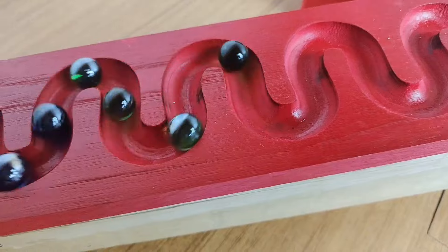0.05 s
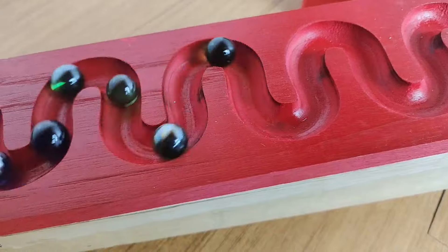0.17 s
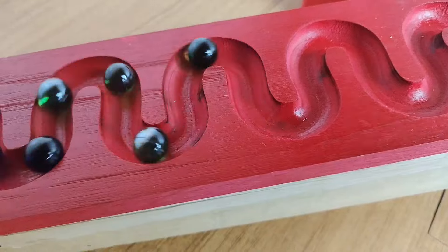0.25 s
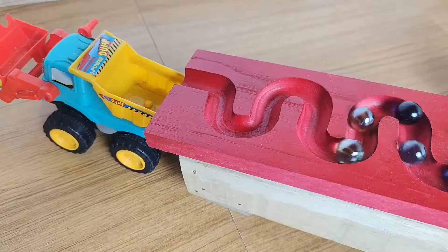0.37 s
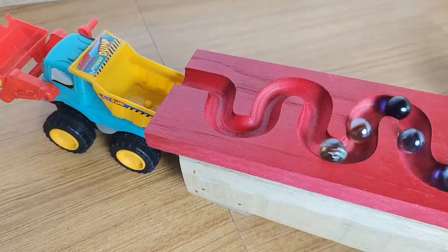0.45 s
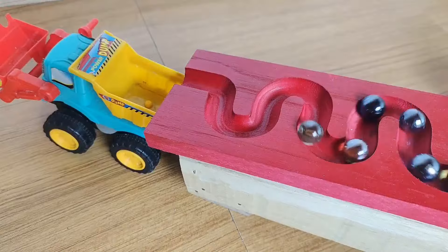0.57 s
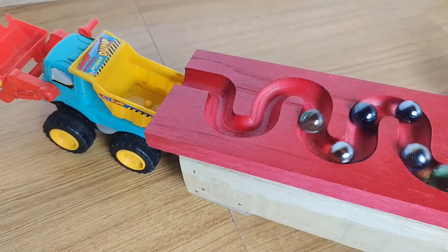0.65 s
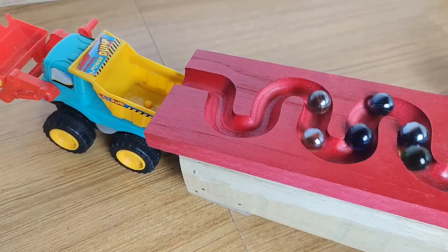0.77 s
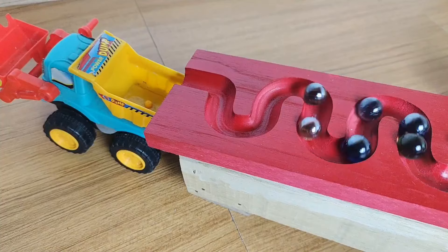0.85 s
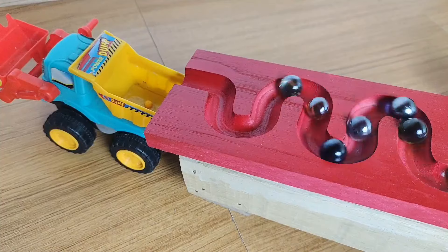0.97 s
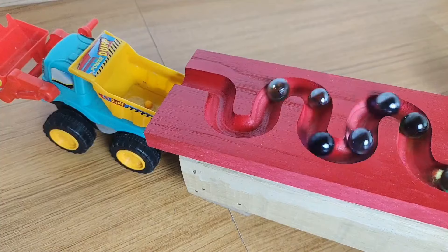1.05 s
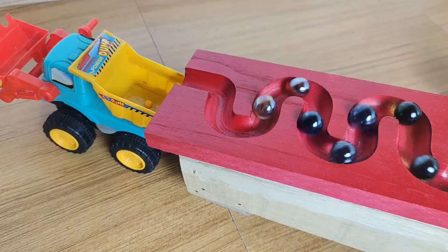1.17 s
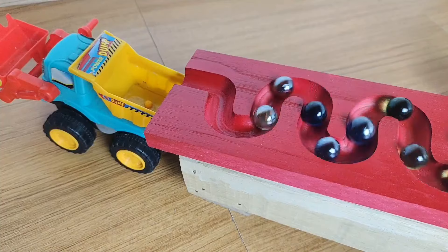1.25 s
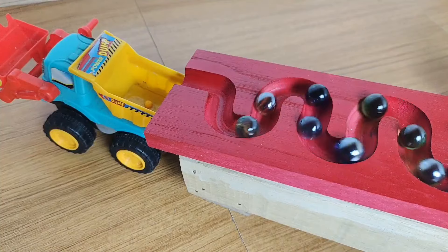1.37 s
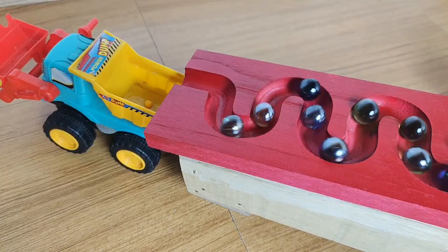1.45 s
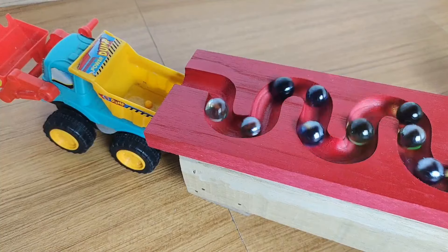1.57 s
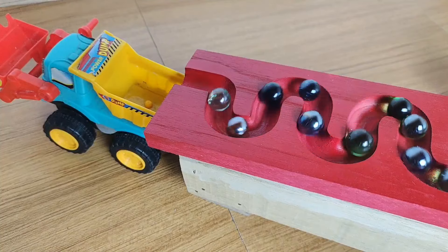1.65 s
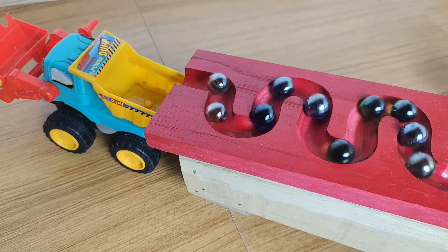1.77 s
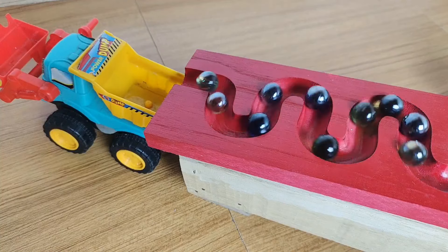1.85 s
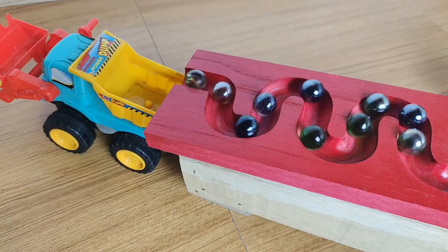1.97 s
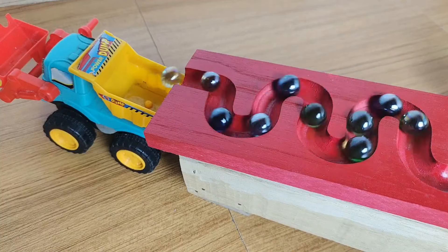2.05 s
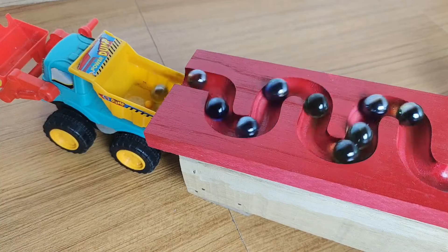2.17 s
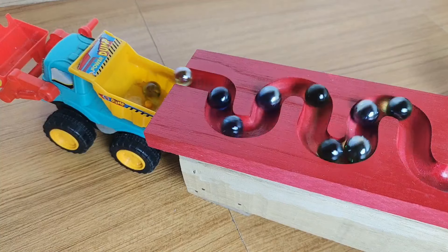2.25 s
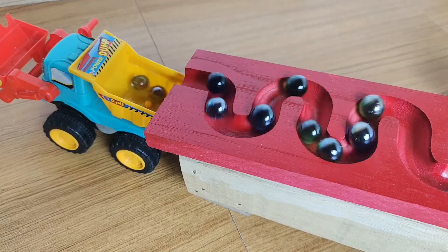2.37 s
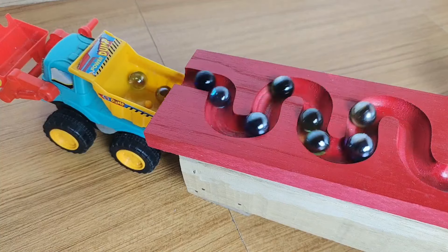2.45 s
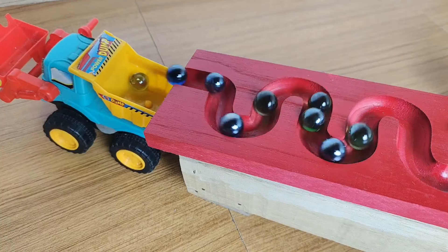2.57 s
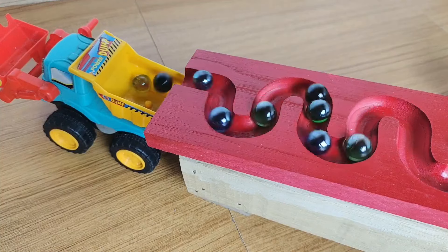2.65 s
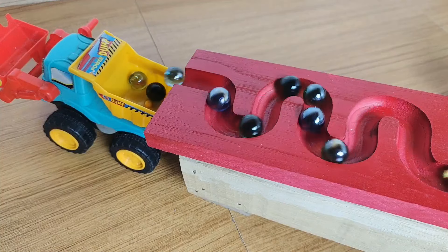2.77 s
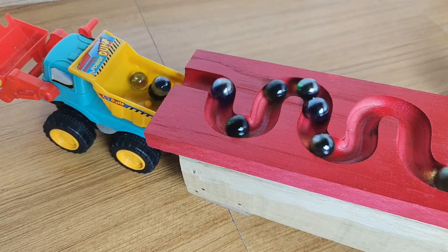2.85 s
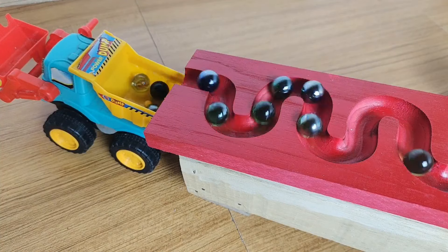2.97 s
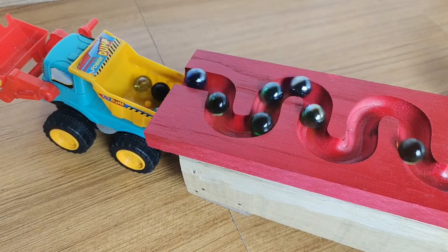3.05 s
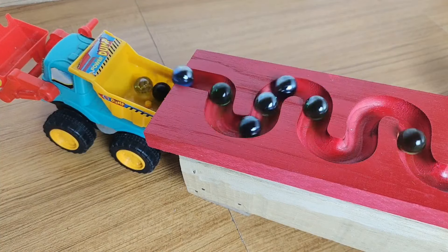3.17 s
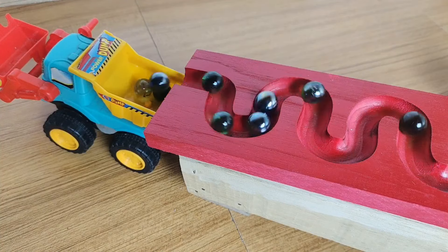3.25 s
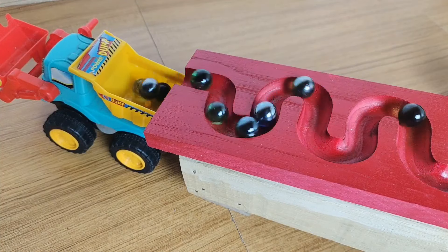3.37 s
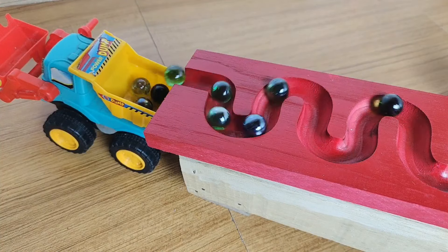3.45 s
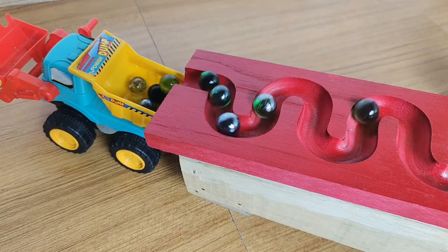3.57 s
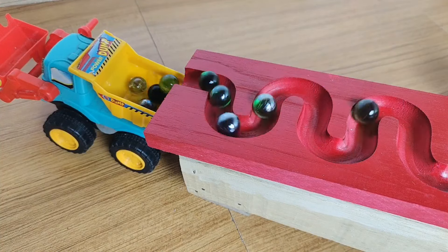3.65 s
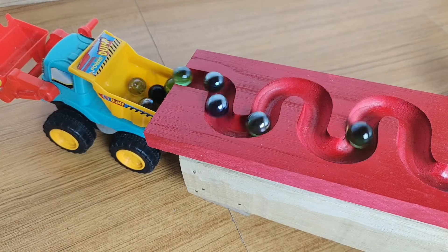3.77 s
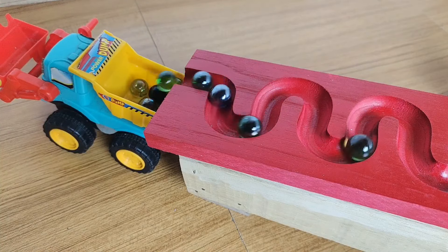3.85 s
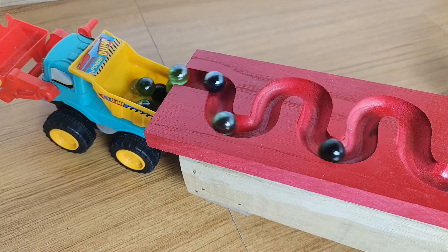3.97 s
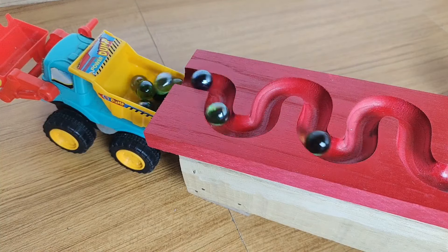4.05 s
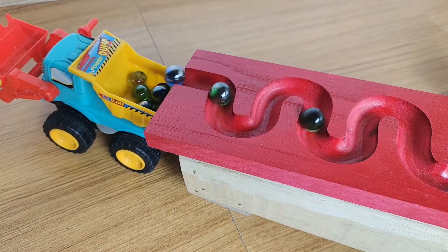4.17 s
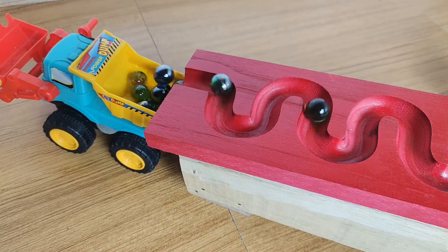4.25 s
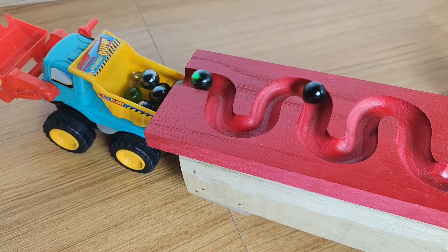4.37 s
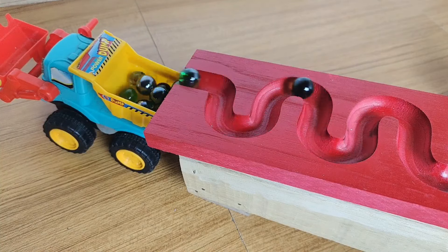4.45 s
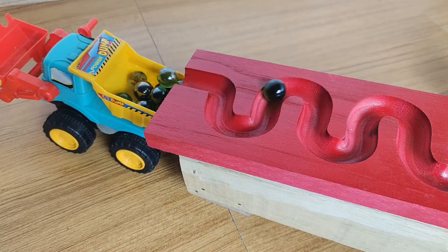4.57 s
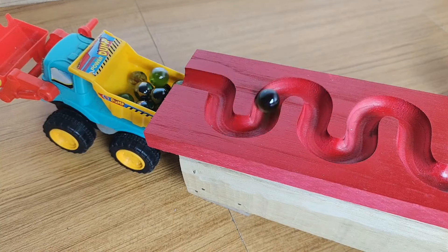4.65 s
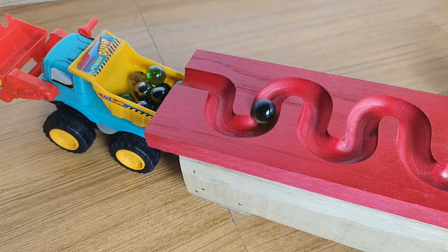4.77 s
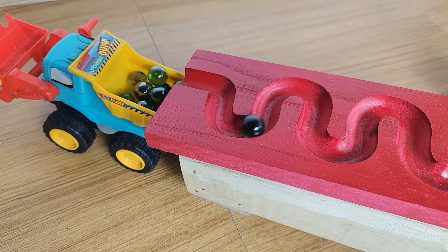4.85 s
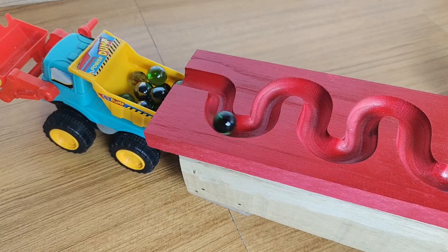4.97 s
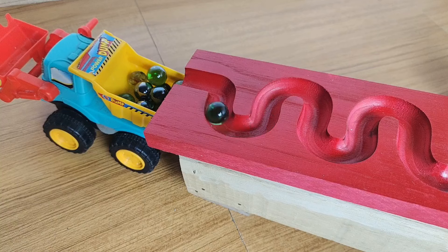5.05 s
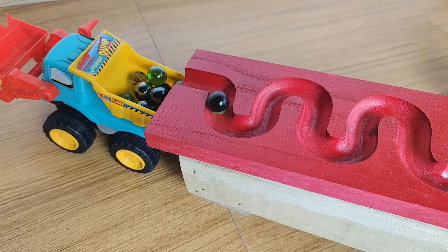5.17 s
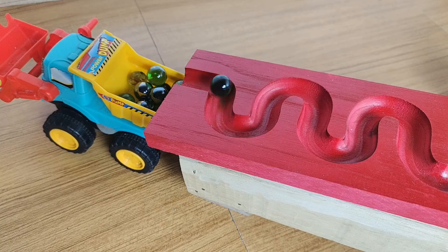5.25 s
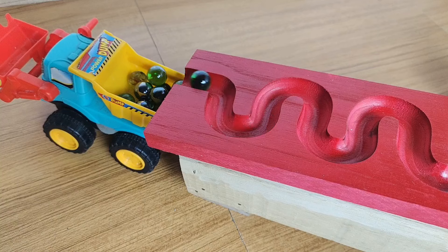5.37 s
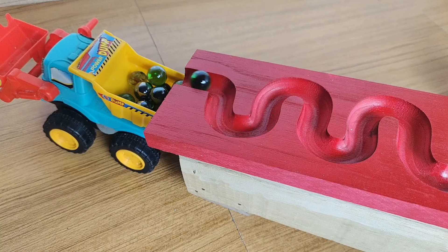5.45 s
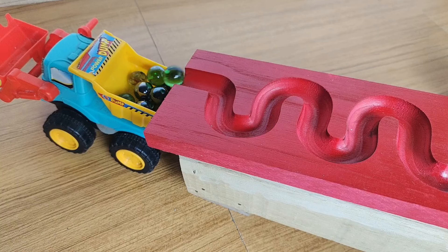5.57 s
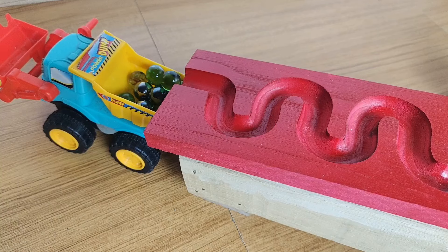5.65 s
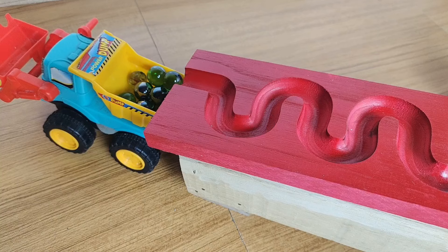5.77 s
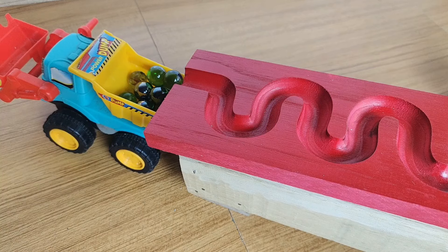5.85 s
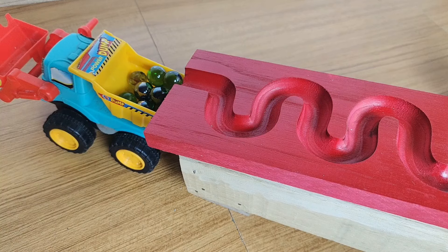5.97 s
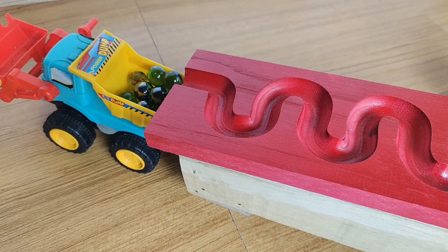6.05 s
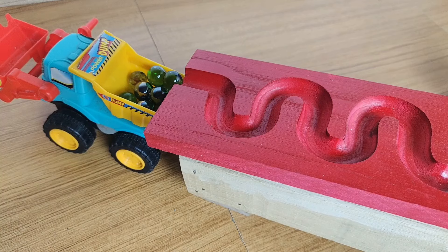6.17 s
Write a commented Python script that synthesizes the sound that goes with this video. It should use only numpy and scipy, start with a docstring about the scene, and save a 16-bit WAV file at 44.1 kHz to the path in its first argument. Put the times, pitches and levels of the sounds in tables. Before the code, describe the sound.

Close stereo pickup in a bare, hard-floored room: bright glass clacks open at slightly higher pitch, then a dense stream of woody knocks and rumbling. The rolling suddenly softens near two seconds as marbles start landing in thin plastic, ticking, ringing and knocking against one another. Clacks cluster around four seconds, then a lone marble rolls faintly, lands around five and a half, and quiet room tone remains.

```python
"""Glass marbles clack together over a soft rumble as they roll down a winding groove in a wooden board.
Countless tiny bumps shake the board into its rumble, and knocks in the bends strike single notes of the wood.
From about two seconds on, marbles drop into the plastic bed of a toy truck, which ticks and rings on two notes.
A hard-floored room answers the hits; the rolling grows faint and fades, leaving a murmur and a low hum."""
import sys
import numpy as np
from scipy import signal
from scipy.fft import rfft, irfft
from scipy.io import wavfile
from scipy.ndimage import uniform_filter1d, map_coordinates

SR = 44100
rng = np.random.default_rng(int(sys.argv[2]) if len(sys.argv) > 2 else 0)


def digitize_waveform(pressure):
    """Quantize a signal to 16-bit integers and store it at the path in sys.argv[1].

    Rows of a 2-D input are taken as channels; values are limited to [-1, 1].
    """
    field = np.atleast_2d(pressure).T
    bounded = np.clip(field, -1, 1)
    quanta = np.round(bounded * 32767).astype(np.int16)
    wavfile.write(sys.argv[1], SR, quanta)


N = 273406
TIME = np.arange(N) / SR
# the first shot lasts until this time (s) and plays faster, so its hits and rolling ring higher by this ratio
FIRST_SHOT_S, FIRST_SHOT_SPEED = .45, 1.17
# travel time to the right channel, then the extra time to the left one (s)
FLIGHT_S, LEFT_LAG_S = 0.001121, .00039
# the board lies nearly straight ahead, so its sound reaches both channels almost at once (s)
BOARD_LAG_S = .00008


def undb(db):
    """Turn decibels into gain."""
    return 10 ** (np.asarray(db) / 20)


def unit(x):
    """Scale to rms 1."""
    return x / np.sqrt(np.mean(x ** 2))


def convolve(x, response):
    """Pass each channel through a response, keeping the length of x."""
    full = signal.fftconvolve(np.atleast_2d(x), np.atleast_2d(response), axes=1)
    return full[:, :x.shape[-1]]


def curve(rows):
    """Join rows of time and value by straight lines, one value a sample."""
    return np.interp(TIME, *np.transpose(rows))


def walk(rate):
    """Slow random wavering with a spread near 1, drawing new values at this rate in Hz."""
    k = int(SR / rate)
    steps = np.repeat(rng.standard_normal(N // k + 1), k)
    return unit(uniform_filter1d(steps, k)[:N])


def body(points, modes=(), pitch=1, size=8192):
    """Response of an object, with unit energy: a broad spectrum with resonances standing on it."""
    hz = np.maximum(np.arange(size // 2 + 1) * SR / size, 1) / pitch
    at, db = np.transpose(points)
    broad = undb(np.interp(np.log(hz), np.log(at), db))
    power = 1
    for f, width, peak in modes:
        power = power + undb(peak) ** 2 * 2 / (1 + (2 * (hz - f) / width) ** 2)
    # folding the cepstrum to one side makes the response start at once (minimum phase)
    cepstrum = irfft(np.log(broad * np.sqrt(power)))
    causal = 2 * cepstrum[:size // 2] * (np.arange(size // 2) > 0)
    response = irfft(np.exp(rfft(causal, size)))
    return response / np.linalg.norm(response)


def struck_spot(modes, spread_db, ring_db=0):
    """Each spot on an object favours some of its resonances over the others."""
    lift = ring_db + spread_db * (2 * rng.random(len(modes)) - 1)
    return [(hz, width, db + extra) for (hz, width, db), extra in zip(modes, lift)]


def diffuse(count, merge_hz=800):
    """Noise from all directions: alike in both channels in the bass, nearly unrelated above."""
    mid, side = rfft(rng.standard_normal((2, count)))
    alike = .94 * np.sinc(np.arange(len(mid)) * SR / count / merge_hz)
    mid, side = mid * np.sqrt(1 + alike), side * np.sqrt(1 - alike)
    return irfft(np.array([mid + side, mid - side]), count) / np.sqrt(2)


def tail(t60, rise_s, count):
    """Reflections that build up, then die away by 60 dB in t60 seconds; about unit energy a channel."""
    t = np.arange(count) / SR
    shape = undb(-60 * t / t60) * (1 - np.exp(-t / rise_s))
    return diffuse(count) * shape / np.linalg.norm(shape)


def contact(scatter_db, t60, lag_s=LEFT_LAG_S, count=6000):
    """One push reaching right, then left, along with scatter from the board, the toy and the floor."""
    out = undb(scatter_db) * tail(t60, 0.00088, count)
    # each marble lies in a slightly different direction
    lag = max(int(lag_s * SR + 3 * rng.standard_normal()), 0)
    out[0, lag] += 1
    out[1, 0] += 1
    return out / np.sqrt(1 + undb(scatter_db) ** 2)


def add(out, s, sound):
    """Mix in a sound that starts at time s and arrives after its travel time."""
    start = max(int((s + FLIGHT_S) * SR), 0)
    out[:, start:start + sound.shape[1]] += sound[:, :N - start]


def pitch_at(s):
    """How much higher hits ring at this moment, as a ratio."""
    return FIRST_SHOT_SPEED if s < FIRST_SHOT_S else 1


def speed_up_first_shot(x):
    """Read the first shot faster, which raises its pitch, and scale the whole to rms 1."""
    at = np.cumsum(np.where(TIME < FIRST_SHOT_S, FIRST_SHOT_SPEED, 1))
    return unit(np.array([map_coordinates(channel, [at], mode="mirror") for channel in x]))


def bumps(per_s, spread_db, sway_db):
    """Tiny pushes of one marble on the grain of the wood, at uneven gaps and with wavering force."""
    rate = per_s * np.exp(.6 * walk(150))
    hit = np.diff(np.floor(np.cumsum(rate / SR)), prepend=0) > 0
    sign = rng.choice([-1, 1], N)
    force_db = spread_db * rng.uniform(-0.42, 1, N) + sway_db * walk(14)
    return hit * sign * undb(force_db)


# How loud the rolling is. Each row: time in seconds, rumble in dB, gritty rattle in dB.
ROLL_LEVELS = [(0, -27.5, -22), (.23, -29.5, -27.5), (.38, -22, -25), (.58, -17.5, -23),
               (1.1, -17.5, -22.5), (1.45, -19.5, -20.5), (1.65, -18.5, -27.5), (2.042, -18.5, -23.5),
               (2.1, -29.5, -30), (2.4, -29, -33), (2.5, -30, -29.5), (2.66, -28, -37), (2.8, -30.5, -27),
               (2.95, -26.5, -27.5), (3.1, -31, -30), (3.26, -34, -35), (3.38, -30, -30), (3.6, -33.5, -32),
               (3.71, -33.5, -36.5), (3.88, -30.5, -36), (4.25, -30.5, -36), (4.44, -32.5, -35),
               (4.62, -46, -43), (4.72, -44, -39), (4.89, -42.5, -45.5), (4.93, -37.5, -46),
               (4.965, -56, -51), (5.03, -39, -45), (5.07, -42, -56), (5.118, -35, -41), (5.16, -46, -52),
               (5.23, -40.5, -50), (5.32, -36, -46), (5.39, -34, -44), (5.44, -44, -53), (6.2, -79, -69)]
# Notes on which the wooden board rings. Each row: pitch in Hz, width in Hz, strength in dB.
BOARD_MODES = [(62.4, 24, 5), (138.6, 12, 6), (320, 13, -3.5), (381.3, 8.9, 6.5), (399.5, 8.1, 1),
               (461.6, 14, 9.5), (506, 22, 4.5), (537, 27, -0.5), (622, 37, 2), (766, 26, 8.5),
               (850, 23, 2.5), (977, 50, 5), (1262, 84, 3.5), (1407, 77, 3.5), (1582, 32, 5.5)]
# Broad tone of the wood. Each row: frequency in Hz, level in dB.
WOOD_TONE = [(30, -33.5), (55, -28), (90, -33), (190, -12.5), (300, -4), (420, -3.5), (550, -1),
             (660, -7.5), (900, -6.5), (1300, -14), (2500, -45.5), (8000, -98.5)]
# Broad tone of the hard, gritty edge. Each row: frequency in Hz, level in dB.
GRIT_TONE = [(200, -27), (550, -2), (850, -3.5), (1150, -2), (1500, -7.5), (1850, -9.5), (2500, -15.5),
             (3500, -27), (5200, -25.5), (7000, -35.5), (9000, -36), (9800, -74)]
# Hollow ring of the board's overhanging end. Each row: frequency in Hz, level in dB.
HOLLOW_TONE = [(60, -26), (135, -5.5), (220, -28), (310, -15.5), (395, 5), (475, -1), (570, -6), (680, -18),
               (790, -5.5), (1000, -34.5), (1200, -33.5), (2000, -86.5)]
# How strongly the marbles reach that end. Each row: time in seconds, level in dB against the rumble.
HOLLOW_REACH = [(0, -4.5), (2.0, -25.5), (2.6, -15), (4.4, -11), (4.8, 5.5), (5.4, -13.5)]


def rolling(count=6, turn_db=3.5, bend_s=0.199):
    """Marbles shake the board from their own places, swelling by turns in the bends every bend_s seconds."""
    rumble, hollow, grit = 0, 0, 0
    for marble in range(count):
        pushes = bumps(per_s=48, spread_db=7.5, sway_db=.8)
        hard = pushes * np.abs(pushes)  # squared force: the hardest bumps dominate the gritty rattle
        turn = undb(turn_db * np.cos(2 * np.pi * (TIME / bend_s + marble / count)))
        near = contact(scatter_db=7.0, t60=0.064, lag_s=BOARD_LAG_S, count=16000)
        path = near + undb(-4.0) * tail(t60=0.62, rise_s=0.0081, count=16000)
        modes = struck_spot(BOARD_MODES, spread_db=3.0, ring_db=-0.5)
        rumble = rumble + convolve(pushes * turn, convolve(path, body(WOOD_TONE, modes)))
        hollow_pushes = pushes * turn * undb(2 * walk(18))
        hollow = hollow + convolve(hollow_pushes, convolve(path, body(HOLLOW_TONE, modes)))
        grit = grit + convolve(hard * turn, convolve(path, body(GRIT_TONE, modes)))
    s, rumble_db, grit_db = np.transpose(ROLL_LEVELS)
    board = speed_up_first_shot(rumble) + speed_up_first_shot(hollow) * undb(curve(HOLLOW_REACH))
    rattle = speed_up_first_shot(grit) * undb(np.interp(TIME, s, grit_db))
    return board * undb(np.interp(TIME, s, rumble_db)) + rattle


# Broad tone of the background murmur. Each row: frequency in Hz, level in dB.
MURMUR_TONE = [(20, -6), (45, 3.5), (75, -11), (105, 0.5), (210, -9.5), (300, -6), (460, -4), (620, -10),
               (1000, -9), (2000, -18.5), (3400, -25.5), (5000, -22.5), (7000, -26.5), (9200, -29),
               (9900, -72.5)]
# Humming notes in the murmur. Each row: pitch in Hz, width in Hz, strength in dB.
MURMUR_MODES = [(54.6, 3.3, 1.6), (143, 3.7, 14.6), (1560, 94, 5.4), (1560, 36, 2)]
# Broad tone of the low hum. Each row: frequency in Hz, level in dB.
HUM_TONE = [(25, -37), (58, 13.5), (90, -6.5), (155, -1.5), (230, -11), (480, -11), (1000, -52.5)]
# How loud the hum is. Each row: time in seconds, level in dB.
HUM_LEVELS = [(3.9, -45.5), (5.7, -53), (6.05, -47.5)]


def quiet_room(murmur_db=-48.5):
    """Filtered noise: a faint wavering murmur of the house, and a low hum that sinks, then swells at the end."""
    murmur = unit(convolve(diffuse(N), body(MURMUR_TONE, MURMUR_MODES)))
    hum = unit(convolve(diffuse(N), body(HUM_TONE)))
    return murmur * undb(murmur_db + walk(4.6)) + hum * undb(curve(HUM_LEVELS))


def ping(hz, width_s=0.00018, count=64):
    """The jolt of two spheres meeting: a sine a few cycles long under a bell-shaped swell."""
    t = (np.arange(count) - count / 2) / SR
    return np.exp(-(t / width_s) ** 2 / 2) * np.sin(2 * np.pi * hz * t)


# The loudest clacks of marble on marble. Each row: start in seconds, relative glass click level in dB,
# click pitch in Hz, relative level in dB of the dull thud of what lies under them, thud pitch in Hz.
CLACKS = [(.0014, -12.5, 5660, 11, 766), (.0186, -9, 6050, 6, 740), (0.188, -16, 5950, -19, 950),
          (.244, -6, 8400, 8, 690), (.262, -6, 6800, 7, 1030), (0.3355, -7, 6040, 12, 1340),
          (.38, -20, 5800, -5, 500), (.398, -13, 5800, -2, 600), (0.429, -22, 5700, -17, 500),
          (0.783, -15.5, 4700, -3, 504), (.817, -17.5, 4400, 0, 500), (2.0571, -7.5, 5340, 13, 840),
          (2.2899, -16, 4550, 5.5, 494), (2.5648, -2, 5160, 7, 1090), (2.587, -21, 4050, 12.5, 1080),
          (2.635, -18.5, 5400, 2, 1210), (2.7383, -3, 5300, 12, 920), (2.776, -29, 5150, -0.5, 1370),
          (2.951, -18, 4600, -12, 500), (3.1355, -4.5, 5400, 9.5, 940), (3.208, -14.5, 5200, -1.5, 990),
          (3.406, -23, 5300, -17, 1130), (3.4269, -11, 5740, 9, 663), (3.5344, -14.5, 4520, 1.5, 690),
          (3.588, -20, 5340, -6, 500), (3.7137, -7.5, 5000, 3, 800), (3.7706, -5, 5500, 10.5, 600),
          (3.8118, -7, 5200, 6.5, 840), (3.883, -15.5, 5360, 6, 510), (3.905, -8.5, 5030, 4, 800),
          (3.9467, -7, 4430, 0, 1090), (3.9563, -9.5, 5500, 8, 1030), (3.9743, -8.5, 4730, 11, 930),
          (3.9831, -1.5, 5200, 8.5, 870), (4.016, -10, 6500, 7.5, 1630), (4.098, -6.5, 5100, 9, 950),
          (4.1681, -10.5, 5200, 6.5, 1310), (4.1803, -6, 4660, 9.5, 850), (4.2279, -10.5, 5100, 12.5, 1240),
          (4.274, -13.5, 5500, 4, 620), (4.3767, -14.5, 4800, -0.5, 710), (4.3892, -11, 5200, 5, 840),
          (4.4567, -13, 4300, 9, 800), (4.516, -4, 5320, 9.5, 1200), (4.563, -19, 5630, 0.5, 900),
          (4.5973, -17, 4340, 0.5, 1750), (4.804, -32, 5200, -11.5, 900), (5.4806, -7.5, 4500, -1, 1640),
          (5.6505, -23, 5850, -4.5, 600)]
# Broad tone of the glass. Each row: frequency in Hz, level in dB.
GLASS_TONE = [(400, -43.5), (1500, -17.5), (2600, 4.5), (3500, -16.5), (4200, 0), (5400, -13), (6200, -2.5),
              (7000, -5), (8200, -4.5), (9100, -6), (9700, -37.5), (11000, -65)]
# Thin rings that colour the clicks. Each row: pitch in Hz, width in Hz, strength in dB.
CLICK_MODES = [(4000, 54, 6), (5270, 450, 11.5), (5900, 70, -13), (6100, 52, 1.5), (7300, 150, -3),
               (8180, 57, 3), (9030, 69, -2.5)]
# Broad tone of the dull thud. Each row: frequency in Hz, level in dB.
THUD_TONE = [(60, -42), (200, -19), (400, -2), (750, -4), (1050, -0.5), (1400, -3), (2000, -8),
             (3500, -16.5), (9000, -55.5)]
# Notes on which the truck bed rings. Each row: pitch in Hz, width in Hz, strength in dB.
BED_MODES = [(737, 35, 6), (1645, 47, -0.5), (2044, 35, -2), (2420, 190, 0.5), (3010, 210, 1.5)]


def clacks(ring_width_hz=450, ring_db=7, spot_width_hz=130, spot_db=5):
    """Glass on glass: a sharp ping, bright scatter around its pitch, and a thud where the recoil lands."""
    out = np.zeros((2, N))
    lean = undb([[-1.5], [1.5]])  # the click is stronger on the right
    for s, click_db, click_hz, thud_db, thud_hz in CLACKS:
        pitch = pitch_at(s)
        # dividing by pitch here leaves the struck note where the table puts it
        click_ring = (click_hz / pitch, ring_width_hz, ring_db)
        thud_ring = (thud_hz / pitch, spot_width_hz, spot_db)
        glass = body(GLASS_TONE, [*struck_spot(CLICK_MODES, spread_db=9.5), click_ring], pitch)
        under = body(THUD_TONE, [*struck_spot(BED_MODES, spread_db=5), thud_ring], pitch)
        snap = convolve(contact(scatter_db=-8, t60=.04), ping(click_hz))
        splash = convolve(contact(scatter_db=3.0, t60=0.079), glass)
        thud = convolve(contact(scatter_db=5.5, t60=0.1), under)
        click = snap + undb(8) * splash
        add(out, s, undb(click_db) * click * lean + undb(thud_db) * thud)
    return out


def room(x, split_hz=900):
    """Bare walls and a hard floor ring at once for about half a second; a nearby wall echoes some 8 ms later."""
    low = signal.sosfilt(signal.butter(2, split_hz, fs=SR, output="sos"), x)
    high = signal.sosfilt(signal.butter(2, split_hz, "high", fs=SR, output="sos"), x)
    low_ring = undb(-7.0) * convolve(low, tail(t60=0.43, rise_s=0.004, count=SR))
    high_ring = undb(-4.0) * convolve(high, tail(t60=0.53, rise_s=0.00037, count=SR))
    wall = np.zeros((2, N))
    add(wall, .0065, undb(-12.0) * convolve(x, tail(t60=0.021, rise_s=0.000099, count=2000)))
    return low_ring + high_ring + wall


# The loudest knocks against the groove wall. Each row: start in seconds, relative thump level in dB,
# relative hard edge level in dB, note of the struck bend in Hz.
KNOCKS = [(.369, 12, 2, 1310), (0.482, 2, 3.5, 1350), (.545, 10.5, 6.5, 1340), (0.58, 11, 5.5, 530),
          (0.601, 2, 4.5, 920), (.652, -3.5, 5, 565), (0.764, 6, -3, 520), (.799, 14, 11.5, 1180),
          (.835, 5.5, 7, 1340), (.906, 3.5, 1.5, 695), (0.986, 5, 1, 786), (1.032, -10, 6.5, 1350),
          (1.066, 14.5, 8.5, 700), (1.084, 9, 6.5, 680), (1.167, 17, 15.5, 940), (1.2258, 5, 13.5, 1420),
          (1.245, 17, 13, 784), (1.281, 8.5, -3, 380), (1.303, 5, 1.5, 1350), (1.332, 13.5, 0.5, 465),
          (1.38, 12.5, 12.5, 1530), (1.397, 8.5, 8, 860), (1.421, 9, 1, 480), (1.465, 13, 12, 1040),
          (1.493, -6, 7.5, 1010), (1.516, -10, 8.5, 930), (1.561, 4.5, 5, 1370), (1.647, 5, 7.5, 940),
          (1.736, 5.5, 8, 1460), (1.781, 3, 3, 880), (1.909, 1, 10, 685), (1.93, 8.5, 7.5, 750),
          (2.012, 3.5, 5, 790), (2.534, -6.5, -14, 980), (2.695, -4, -16, 540), (3.026, -5, -3.5, 644),
          (3.082, -1.5, -16, 955), (3.377, -7.5, -16, 1030), (3.626, -1, -12, 460), (3.643, 4, -3, 460),
          (3.883, -15.5, -10, 1000), (4.654, -5.5, -5.5, 760), (4.689, -9, -4, 850), (4.925, -12, -21, 844),
          (4.981, 2.5, -3.5, 980), (5.11, -5, -17, 786), (5.186, 2, -11.5, 806), (5.296, -4, -18, 800)]


def knocks(hollow_db=-5, spot_width_hz=170, spot_db=5, gap_s=(0.00282, .012), second_db=-7.5):
    """A marble touches a bend twice: a hard edge, a thump on the bend's note, and the board's hollow ring."""
    out = np.zeros((2, N))
    for s, thump_db, edge_db, hz in KNOCKS:
        pitch = pitch_at(s)
        bend_note = (hz / pitch, spot_width_hz, spot_db)
        modes = [*struck_spot(BOARD_MODES, spread_db=5.5, ring_db=4.0), bend_note]
        thump = body(WOOD_TONE, modes, pitch) + undb(hollow_db) * body(HOLLOW_TONE, modes, pitch)
        edge = body(GRIT_TONE, modes, pitch)
        knock = undb(thump_db) * thump / np.linalg.norm(thump) + undb(edge_db) * edge
        push = contact(scatter_db=-4, t60=.035, lag_s=BOARD_LAG_S)
        second_push = contact(scatter_db=-4, t60=.035, lag_s=BOARD_LAG_S)
        add(out, s, convolve(push, knock))
        add(out, s + rng.uniform(*gap_s), undb(second_db) * convolve(second_push, knock))
    return out


# Landings on the plastic bed. Each row: start in seconds, relative blow level in dB,
# lower ring of the struck spot in Hz, its upper ring in Hz, relative hard tick level in dB.
BED_HITS = [(2.0572, 6, 1490, 2330, 5), (2.2546, 14.5, 1650, 2520, -8), (2.4724, -7, 1440, 2200, -36),
            (2.5956, -0.5, 1130, 2150, 3), (2.8446, 9.5, 1630, 2600, -7), (2.8821, 6.5, 1500, 2520, -12),
            (3.2856, 10, 1630, 2070, -36), (3.3217, 5, 1110, 2550, -6.5), (3.4302, 8, 1500, 2270, 6),
            (4.0984, 4.5, 1600, 2540, 1.5), (4.2121, 5.5, 1330, 2260, 3), (4.4578, 6.5, 1640, 2100, 9),
            (5.4813, 9, 1670, 2020, 6), (5.54, -4, 1680, 1940, -15), (5.561, -7, 1030, 1960, -22),
            (5.657, -12, 1380, 1960, -13), (5.6751, -5, 1550, 1980, -27), (5.7792, -11, 1030, 2110, -20)]
# Broad tone of the plastic. Each row: frequency in Hz, level in dB.
PLASTIC_TONE = [(100, -70.5), (400, 4.5), (650, 4.5), (950, 5), (1250, 2), (1620, 4), (2050, 1.5),
                (2650, 0), (3400, -7), (5000, -1.5), (8500, -23.5), (10000, -57.5)]


def truck_bed(low_width_hz=150, high_width_hz=260, spot_db=7.5, rebound_s=0.0083, rebound_db=-5):
    """Thin plastic ticks and rings on two notes of the spot; a softer second touch stirs only the lower."""
    out = np.zeros((2, N))
    glass = body(GLASS_TONE, CLICK_MODES)
    for s, blow_db, low_hz, high_hz, tick_db in BED_HITS:
        modes = [*BED_MODES, (low_hz, low_width_hz, spot_db)]
        plastic = body(PLASTIC_TONE, [*modes, (high_hz, high_width_hz, spot_db)])
        rebound = body(PLASTIC_TONE, modes)
        push, second_push = (contact(scatter_db=-1, t60=.04) for _ in range(2))
        add(out, s, convolve(push, undb(blow_db) * plastic + undb(tick_db) * glass))
        add(out, s + rebound_s, convolve(second_push, undb(blow_db + rebound_db) * rebound))
    return out


def jostle(level_db=-24, spread_db=4, earliest_s=.03, latest_s=0.21, count=3):
    """After each landing the marbles in the bed shift and tap the plastic; later taps tend to be fainter."""
    out = np.zeros((2, N))
    for s, blow_db, *_ in BED_HITS:
        for when, force in rng.random((count, 2)):
            plastic = body(PLASTIC_TONE, struck_spot(BED_MODES, spread_db=6, ring_db=3))
            tap = convolve(contact(scatter_db=-5, t60=.025), plastic)
            tap_db = blow_db + level_db + spread_db * (force - when)
            add(out, s + earliest_s + when * (latest_s - earliest_s), undb(tap_db) * tap)
    return out


def scene():
    """Mix the marbles, the room's answer to their hits, and the background."""
    groove, glass, bed = knocks(), clacks(), truck_bed() + jostle()
    # each kind of hit excites the room by its own amount
    sent = undb(2) * groove + undb(-0.37) * glass + undb(-1) * bed
    # the first shot is closer, so less of the room is heard
    room_db = np.where(TIME < FIRST_SHOT_S, -6, 0)
    return rolling() + groove + glass + bed + room(sent * undb(room_db)) + quiet_room()


# Colour of the left channel against the right. Each row: frequency in Hz, difference in dB.
LEFT_RIGHT_BALANCE = [(500, 0.1), (2500, 1.2), (4800, 1.5), (6500, -1.5), (8200, 5.5)]


def record(dry, ceiling=.95, top_hz=11300):
    """Colour left and right differently, round the loudest peaks under the ceiling and cut the top."""
    hz = np.arange(N // 2 + 1) * SR / N
    balance_db = np.interp(hz, *np.transpose(LEFT_RIGHT_BALANCE))
    heard = irfft(rfft(dry) * undb(np.array([balance_db, -balance_db]) / 2), N)
    rounded = heard / (1 + (heard / ceiling) ** 6) ** (1 / 6)
    return signal.sosfilt(signal.ellip(8, .2, 70, top_hz, fs=SR, output="sos"), rounded)


dry = scene()
out = record(dry)
digitize_waveform(out)
```